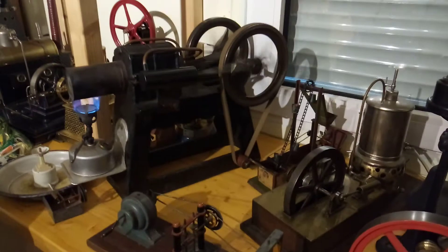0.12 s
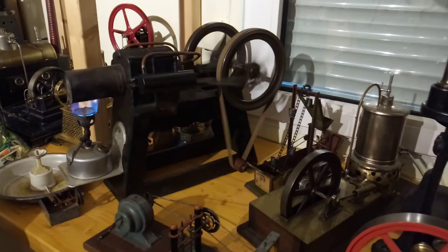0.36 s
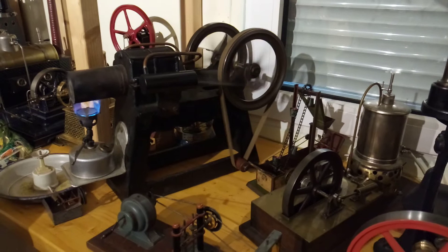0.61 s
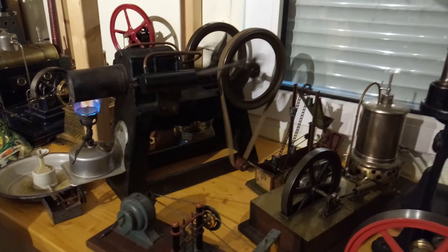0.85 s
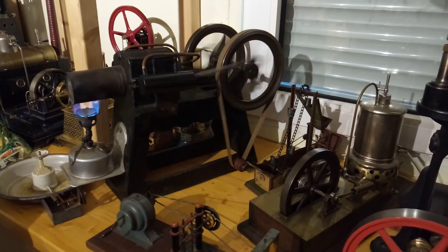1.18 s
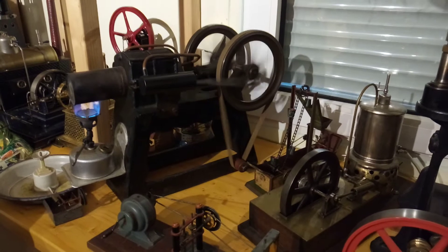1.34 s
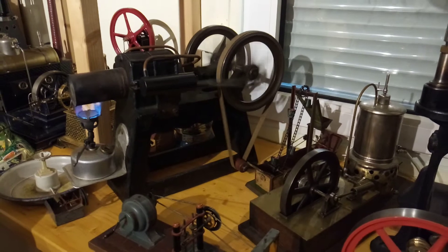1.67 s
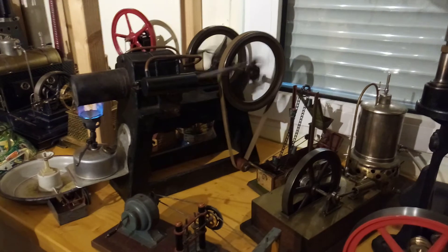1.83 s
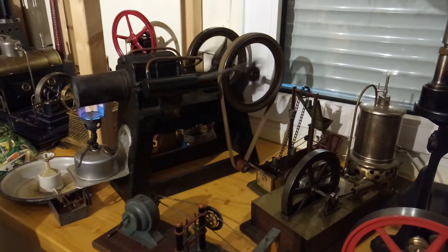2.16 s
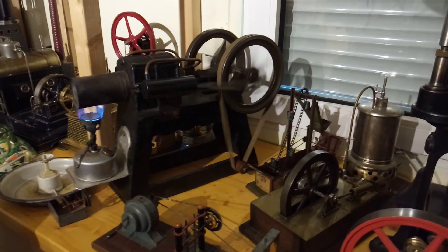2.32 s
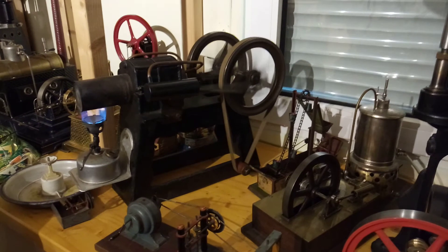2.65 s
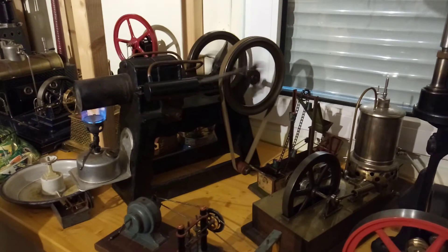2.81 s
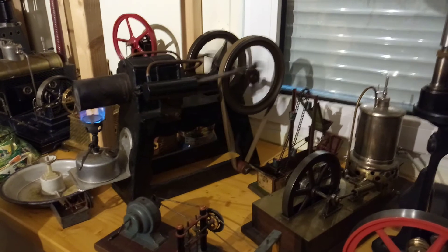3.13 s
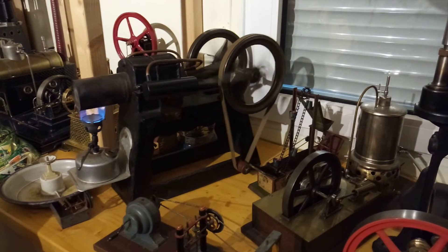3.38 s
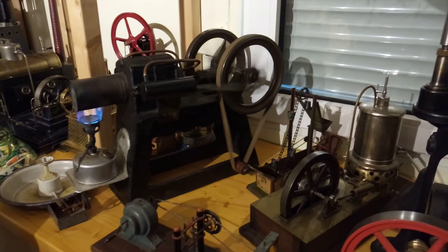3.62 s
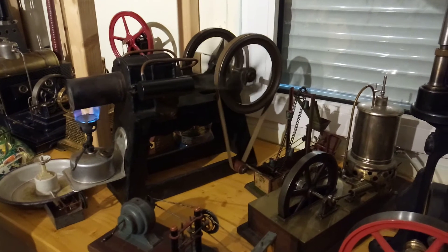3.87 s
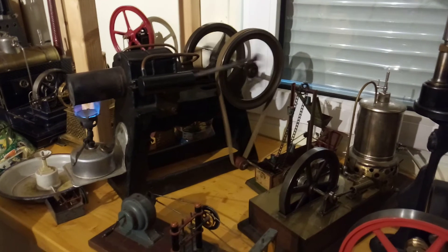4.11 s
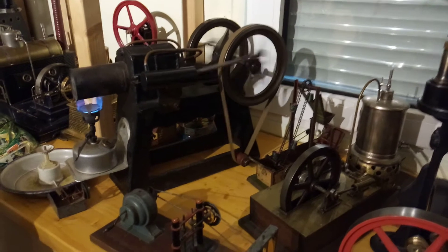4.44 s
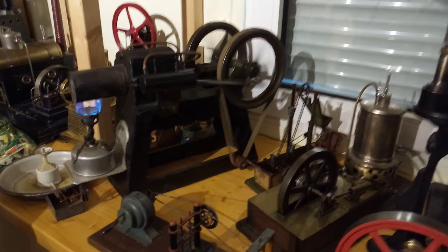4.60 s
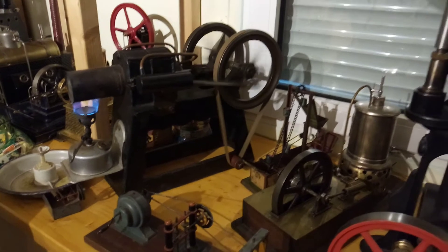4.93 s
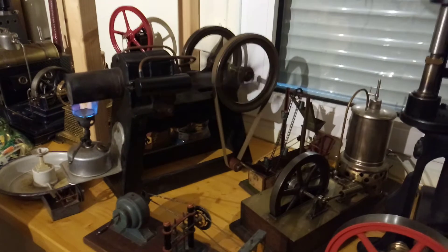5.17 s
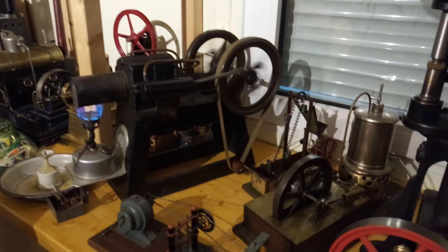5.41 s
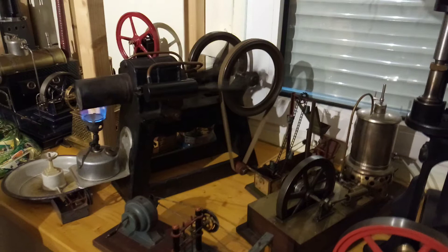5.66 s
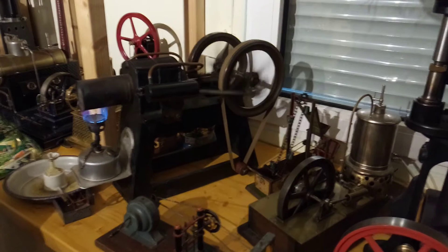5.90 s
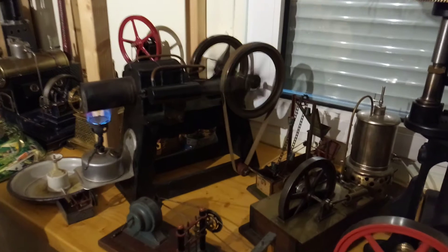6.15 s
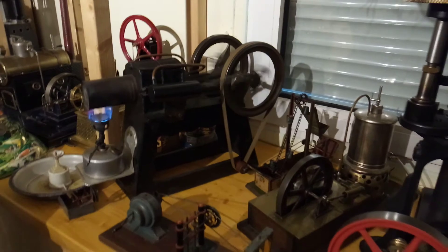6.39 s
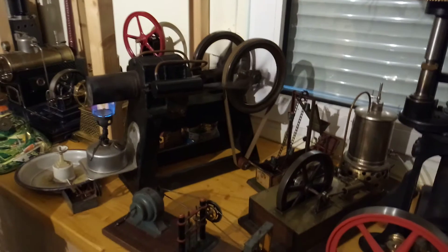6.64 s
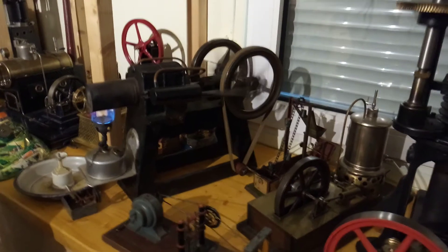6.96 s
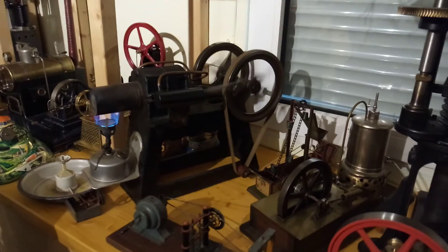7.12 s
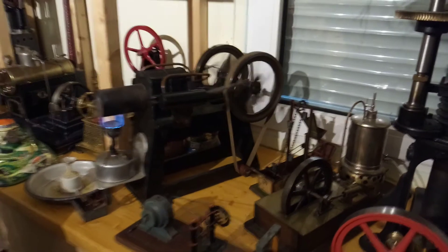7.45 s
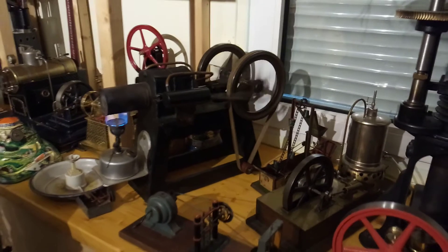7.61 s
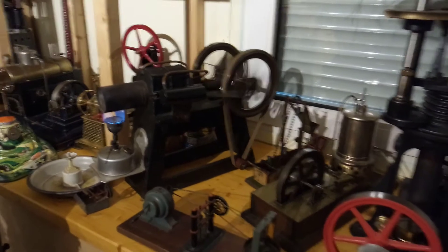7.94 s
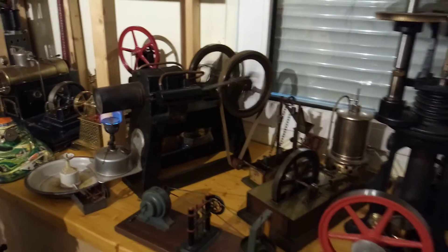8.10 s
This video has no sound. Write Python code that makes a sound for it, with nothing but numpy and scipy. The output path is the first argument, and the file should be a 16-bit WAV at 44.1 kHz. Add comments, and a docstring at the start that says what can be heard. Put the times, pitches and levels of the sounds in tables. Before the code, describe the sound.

An old hot-air engine runs steadily in a small room, with rapid ringing metal knocks and clatter over a soft hiss.

```python
"""A small room, where an old hot-air engine runs on a wooden bench at three turns a second, slowing slightly.
The load reverses at each dead centre, so loose parts cross their play and strike: at one the rod knocks
and rings, at the other the linkage slaps, clinks and clatters. Each stroke rocks the bench by reaction.
Flame and bearings hiss softly; late on, a loose part jumps and a finger bumps the hand-held microphone."""
import sys
import numpy as np
from scipy import signal
from scipy.fft import rfft, irfft
from scipy.io import wavfile

SR = 44100
rng = np.random.default_rng(int(sys.argv[2]) if len(sys.argv) > 2 else 0)


def master(y):
    """Save y as 16-bit WAV."""
    cut = np.clip(np.atleast_2d(y).T, -1, 1)
    pcm = np.round(cut * 32767)  # scale
    wavfile.write(sys.argv[1], SR, pcm.astype(np.int16))


N = 364707
TIME = np.arange(N) / SR

# Normal modes of each body: pitch_hz, relative_level_db, t60_s
ROD_MODES = [(1860, -34, 0.18), (1960, -43, 0.048), (2345, -32, 0.099), (2475, -33.5, 0.28),
             (2697, -30, 0.17), (2880, -32.5, .08), (3600, -40.5, 0.067), (3468, -15, 0.13),
             (3620, -33, .08), (3850, -37.5, 0.33), (3935, -29, 0.11), (4750, -61, 0.18),
             (5300, -42, 0.058)]
FLYWHEEL_MODES = [(1890, -31, .45), (2050, -27, .2), (2452, -44, .25), (3454, -33, .25), (4198, -43, .2)]
CRANK_MODES = [(1883, -31.5, 0.13), (2032, -26, 0.15), (2143, -34.5, 0.17)]
BENCH_MODES = [(52.7, -52.5, 0.32), (72.1, -44.5, 0.39), (116, -59.5, 0.29)]
HOLLOW_BASE_MODES = [(243.5, -37.5, 0.32), (287.4, -36.5, 0.24), (361.8, -42.5, 0.4), (441, -46, 0.43)]
FRAME_MODES = [(893, -37.5, .12), (1366, -38, 0.14), (1760, -52, 0.048), (1816, -36, 0.15),
               (2513, -37, 0.084), (2846, -41, 0.13), (3000, -50, 0.36), (3460, -33, 0.11),
               (3909, -31, 0.075), (4170, -52.5, 0.17), (4850, -39, 0.099), (5530, -43.5, 0.11),
               (5980, -35.5, 0.064), (12700, -63, .07)]
LOOSE_LINK_MODES = [(2363, -20, 0.035), (2445, -27.5, 0.14)]
MICROPHONE_MODES = [(178, 1.5, 0.013), (414, 2, 0.0054)]
# Resonances sustained by belt and bearing friction: pitch_hz, rms_level_db, t60_s
FRICTION_MODES = [(357, -54.5, 0.15), (815, -57.5, 0.15), (875, -56.5, 0.15), (989, -52, 0.13),
                  (1153, -57.5, 0.15), (1176, -55.5, 0.17)]
# Noise spectrum of bearings, belt and flame: frequency_hz, relative_density_db
HISS_SPECTRUM = [(25, -14), (65, -18), (95, -16), (170, -1.5), (350, -0.5), (520, -2.5), (1050, -4),
                 (1400, -6), (2500, -4), (4000, -11), (6700, -18), (7800, -47.5), (9600, -33), (13000, -41),
                 (15500, -33.5)]
# Contacts within one turn, by sound: phase_turns, relative_level_db, t60_s
CONTACTS = { "knock": [(.002, -23.5, 0.023), (.022, -23.5, 0.09)], "chatter": [(.039, -27.5, 0.033),
            (.06, -34.5, 0.12)], "rumble": [(.055, -35, 0.25), (.505, -34.5, 0.16), (.555, -32, 0.04),
            (.63, -37.5, 0.34)], "slap": [(.503, -17.5, 0.11)], "clatter": [(.553, -32, 0.18),
            (.582, -22, 0.069), (.607, -18.5, 0.05), (.635, -31.5, 0.16)]}
# Spectra of the dense ringing after those contacts, by sound: frequency_hz, relative_density_db
CONTACT_SPECTRA = { "knock": [(100, -32), (1400, -18), (1900, 0), (2900, -5), (3500, 6.5), (4400, -12),
                   (6300, -11.5), (8000, -40.5), (12000, -44.5), (15500, -43.5)], "chatter": [(60, -35),
                   (300, -19.5), (1400, -3), (4000, 5), (6300, -7.5), (7700, -16.5), (9200, -20.5),
                   (12000, -31), (15500, -18.5)], "rumble": [(50, -46), (120, -16), (200, -5), (260, 0.5),
                   (360, -7), (520, -8.5), (900, -7.5), (1600, -13), (5000, -57)], "slap": [(60, -61),
                   (280, -6.5), (600, -11), (1450, -5.5), (1850, 8.5), (2700, -5), (3500, -2.5),
                   (4400, -24), (5600, -11.5), (7500, -31), (9000, -21.5), (12000, -46), (15500, -24.5)],
                   "clatter": [(60, -37.5), (280, -9.5), (700, -4), (1300, 1), (2000, -8.5), (3000, 3),
                   (4000, 1), (5100, -0.5), (6200, -7), (7100, -15), (7900, -24.5), (12000, -33.5),
                   (15500, -29.5)]}
# Force of the knock, easing as the engine slows: time_s, gain_db
KNOCK_FORCE = [(0, -0.4), (4.3, -0.56), (7.3, -1.5), (8, -3)]
# Usual force of the slap on the return stroke: time_s, gain_db
SLAP_FORCE = [(.2, -16), (3.4, -9.5), (4.8, -10), (5.4, -4.5), (6.9, -8.5), (7.5, -15)]
# Turns on which the rod falls back much harder or softer: time_s, extra_db
ODD_SLAPS = [(1.19, -8), (3.15, 5), (3.81, -10.5), (4.47, -9), (5.13, 6.5), (6.13, 3.5), (7.13, 8.5),
             (8.13, 7.5)]
# Jump of a loose part: start_s, level_db
STRAY_RATTLE = [(6.023, -27.5)]
# Tap of a finger on the microphone: start_s, gain_db
FINGER_BUMP = [(6.592, -13)]
# Treble as the microphone drifts in the hand: time_s, gain_db
AIM_TREBLE = [(0, 1.5), (2.5, 0.5), (4.5, 1.5), (5.2, 3.5), (6.7, 3), (8.2, 3.5)]

FIRST_KNOCK_S, FIRST_TURN_S, SLOWING_S_PER_TURN = 0.0572, 0.323473, 0.0005156
HISS_DB, CLATTER_GAIN_DB = -44.5, -2.5
ROOM_T60_S = 0.34


def from_db(db):
    """Amplitude ratio for a level in decibels."""
    return 10 ** (np.asarray(db) / 20)


def add(out, start_s, sound):
    """Superposition: a sound adds to those already present."""
    start = max(int(start_s * SR), 0)
    remaining = max(N - start, 0)
    out[start:start + len(sound)] += sound[:remaining]


def at_crank(phase_turns, count=25):
    """Steady slowing: times at which the crank passes a phase, each turn a little longer than the last."""
    turns = np.arange(count) + phase_turns
    return FIRST_KNOCK_S + FIRST_TURN_S * turns + SLOWING_S_PER_TURN * turns * (turns - 1) / 2


def impact_envelope(t60_s, size):
    """Damping: after an almost instant rise, amplitude falls exponentially."""
    t = TIME[:size]
    return from_db(-60 * t / t60_s) * (1 - np.exp(-t / .0004))


def coloured(x, spectrum, size=8192):
    """Minimum-phase filtering: a causal response of unit energy, so white noise keeps its level."""
    frequency_hz, density_db = np.transpose(spectrum)
    bins_hz = np.fft.rfftfreq(size, 1 / SR)
    gain_db = np.interp(np.log(bins_hz + 1), np.log(frequency_hz), density_db)
    cepstrum = irfft(np.log(from_db(gain_db)))[:size // 2]
    cepstrum[1:] *= 2
    response = irfft(np.exp(rfft(cepstrum, size)))
    return signal.fftconvolve(x, response / np.sqrt(np.sum(response ** 2)))[:len(x)]


def resonator(force, pitch_hz, t60_s):
    """Damped oscillator: each impulse of force starts a decaying sine."""
    decay, angle = from_db(-60 / (t60_s * SR)), 2 * np.pi * pitch_hz / SR
    return signal.lfilter([0, np.sin(angle)], [1, -2 * decay * np.cos(angle), decay ** 2], force + 1e-18)


def ring(modes, starts_s, gain_db, scatter_db, rise_s, size=22000):
    """Free vibration: each blow excites a sum of damped modes, their strengths scattered at random."""
    pitch_hz, mode_db, t60_s = np.transpose(modes)
    t, out = TIME[:size], np.zeros(N)
    decay = from_db(-60 * t / t60_s[:, None])
    rise = 1 - from_db(-60 * t / rise_s)
    partials = np.sin(2 * np.pi * np.outer(pitch_hz, t)) * decay * rise
    signs = (-1) ** np.arange(len(pitch_hz))   # neighbouring modes swing in opposite directions
    uneven_db = scatter_db * rng.standard_normal((len(starts_s), len(pitch_hz)))
    strengths = from_db(np.reshape(gain_db, (-1, 1)) + mode_db + uneven_db)
    for start_s, sound in zip(starts_s, (signs * strengths) @ partials):
        add(out, start_s, sound)
    return out


def contacts(name, gain_db, fresh_share, scatter_db, size=9000):
    """Modal overlap: dense modes ring as noise, which partly repeats as the same surfaces meet again."""
    out = np.zeros(N)
    for phase_turns, contact_db, t60_s in CONTACTS[name]:
        repeated, envelope = rng.standard_normal(size), impact_envelope(t60_s, size)
        for start_s, turn_db in zip(at_crank(phase_turns), gain_db):
            fresh = rng.standard_normal(size)
            ringing = np.sqrt(1 - fresh_share) * repeated + np.sqrt(fresh_share) * fresh
            strength = from_db(contact_db + turn_db + scatter_db * rng.standard_normal())
            add(out, start_s, strength * envelope * ringing)
    return coloured(out, CONTACT_SPECTRA[name])


def stroke_forces():
    """Impact force sets level, turn by turn: the knock eases, the slap is uneven, the clatter holds."""
    knock_db = np.interp(at_crank(0), *np.transpose(KNOCK_FORCE))
    returns_s = at_crank(0.42)
    slap_db = np.interp(returns_s, *np.transpose(SLAP_FORCE))
    for time_s, extra_db in ODD_SLAPS:
        slap_db[np.argmin(np.abs(returns_s - time_s))] += extra_db
    return knock_db, slap_db, np.full(len(returns_s), CLATTER_GAIN_DB)


def running_noise():
    """Random forcing: flame and friction hiss, and the friction keeps a few resonances murmuring."""
    out = from_db(HISS_DB) * coloured(rng.standard_normal(N), HISS_SPECTRUM)
    for pitch_hz, level_db, t60_s in FRICTION_MODES:
        murmur = resonator(rng.standard_normal(N), pitch_hz, t60_s)
        out += from_db(level_db) * murmur / murmur.std()
    return out


def rod_ring(knock_db):
    """Backlash: as the load reverses, the rod crosses its play, rings, seats on the crank and rebounds."""
    rod = ring(ROD_MODES, at_crank(0), knock_db + 0.37, scatter_db=1.1, rise_s=0.0031)
    # the heavy wheel takes up the blow slowly
    wheel = ring(FLYWHEEL_MODES, at_crank(0), knock_db + 0.42, scatter_db=0.5, rise_s=0.031)
    rebound = ring(ROD_MODES, at_crank(.195), knock_db - 18.5, scatter_db=2.5, rise_s=.015)
    seating = ring(CRANK_MODES, at_crank(.11), knock_db, scatter_db=1.2, rise_s=.03)
    return rod + wheel + rebound + seating


def out_stroke(knock_db):
    """Brief impacts excite a wide band: the knock cracks and a bright chatter follows."""
    crack = contacts("knock", knock_db, fresh_share=0.27, scatter_db=2.0)
    chatter = contacts("chatter", np.zeros_like(knock_db), fresh_share=.4, scatter_db=1.2)
    return crack + chatter


def bench(clatter_db):
    """Reaction: the piston shoves the bench to and fro; the boards rumble and the hollow base booms."""
    push = ring(BENCH_MODES, at_crank(0.091), gain_db=-.3, scatter_db=1.3, rise_s=0.065)
    pull = ring(BENCH_MODES, at_crank(.577), gain_db=1.3, scatter_db=0.5, rise_s=0.066)
    boom = ring(HOLLOW_BASE_MODES, at_crank(.5), clatter_db, scatter_db=0, rise_s=0.0054)
    boom += ring(HOLLOW_BASE_MODES, at_crank(.61), clatter_db - 2, scatter_db=2.5, rise_s=0.011)
    rumble = contacts("rumble", clatter_db - .5, fresh_share=0.53, scatter_db=2.45)
    return push - pull + boom + rumble


def return_stroke(slap_db, clatter_db):
    """Backlash in reverse: the rod slaps back, a small link clinks, the linkage clatters on the frame."""
    slaps_s = at_crank(CONTACTS["slap"][0][0])
    slap = contacts("slap", slap_db, fresh_share=0.57, scatter_db=2.5)
    slap += ring(FRAME_MODES, slaps_s, slap_db + 4, scatter_db=2.0, rise_s=0.0042)
    slap += ring(ROD_MODES, slaps_s, slap_db - 13, scatter_db=1.5, rise_s=.003)
    clink = ring(LOOSE_LINK_MODES, at_crank(.552), clatter_db + 3, scatter_db=0, rise_s=0.017)
    clatter = contacts("clatter", clatter_db, fresh_share=0.4, scatter_db=0.36)
    frame = ring(FRAME_MODES, at_crank(.6), clatter_db + 4, scatter_db=2.5, rise_s=0.013)
    return slap + clink + clatter + frame


def stray_rattle(t60_s=0.069, size=9000):
    """Impact noise: a loose part jumps once, out of step with the crank."""
    out = np.zeros(N)
    for start_s, level_db in STRAY_RATTLE:
        add(out, start_s, from_db(level_db) * impact_envelope(t60_s, size) * rng.standard_normal(size))
    return coloured(out, CONTACT_SPECTRA["clatter"])


def microphone_bump():
    """Structure-borne sound: a finger taps the housing, whose heavily damped modes give a dull thud."""
    starts_s, gain_db = np.transpose(FINGER_BUMP)
    return ring(MICROPHONE_MODES, starts_s, gain_db, scatter_db=0, rise_s=0.0036)


def room(x, first_echo_s=0.01, size=20000):
    """Reverberation: dense reflections decay exponentially and are duller than the direct sound."""
    tail = rng.standard_normal(size) * impact_envelope(ROOM_T60_S, size) * (TIME[:size] > first_echo_s)
    tail = coloured(tail, [(100, 1.0), (1000, 2), (3000, -4.5), (7000, -5), (15000, -5.5)])
    return signal.fftconvolve(x, tail / np.sqrt(np.sum(tail ** 2)))[:N]


def aimed(x, treble_hz=5000):
    """Directivity: the treble changes with where the microphone points."""
    treble = signal.sosfiltfilt(signal.butter(2, treble_hz, "high", fs=SR, output="sos"), x)
    treble_gain = from_db(np.interp(TIME, *np.transpose(AIM_TREBLE)))
    return x + (treble_gain - 1) * treble


def scene():
    """Superposition of both strokes, their reflections, the running noise, the bench and the bump."""
    knock_db, slap_db, clatter_db = stroke_forces()
    ringing, knocks = rod_ring(knock_db), out_stroke(knock_db)
    clatters = return_stroke(slap_db, clatter_db) + stray_rattle()
    # the rod and wheel ring clearly, with little added echo
    echoes = room(from_db(-20) * ringing + from_db(-6.5) * knocks + from_db(-11) * clatters)
    engine = ringing + knocks + clatters + echoes + running_noise()
    return (aimed(engine) + bench(clatter_db) + microphone_bump())[None]


def record(dry, low_cut_hz=45, high_cut_hz=16000):
    """Band limiting: the small microphone loses the deepest bass, and the top is cut steeply."""
    thin = signal.sosfilt(signal.butter(3, low_cut_hz, "high", fs=SR, output="sos"), dry)
    return signal.sosfilt(signal.ellip(10, .2, 70, high_cut_hz, fs=SR, output="sos"), thin)


dry = scene()
out = record(dry)
master(out)
```